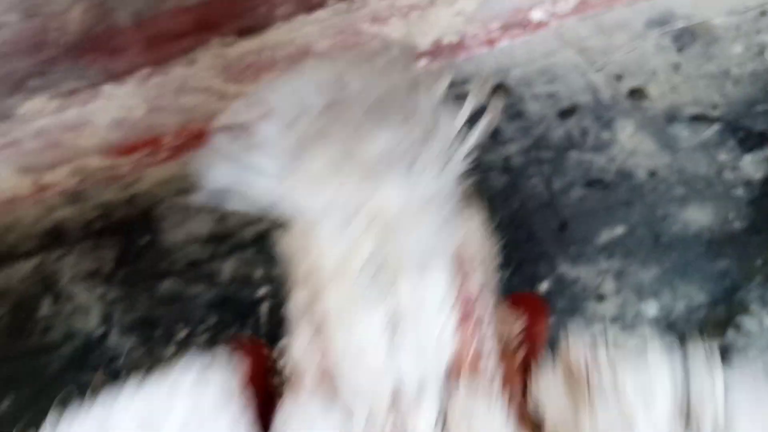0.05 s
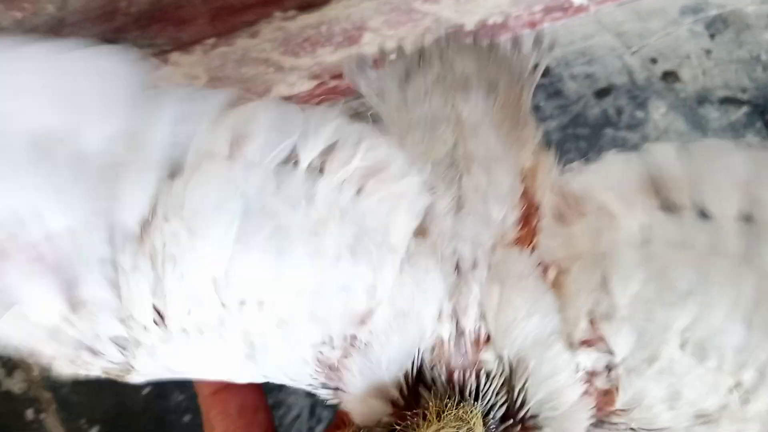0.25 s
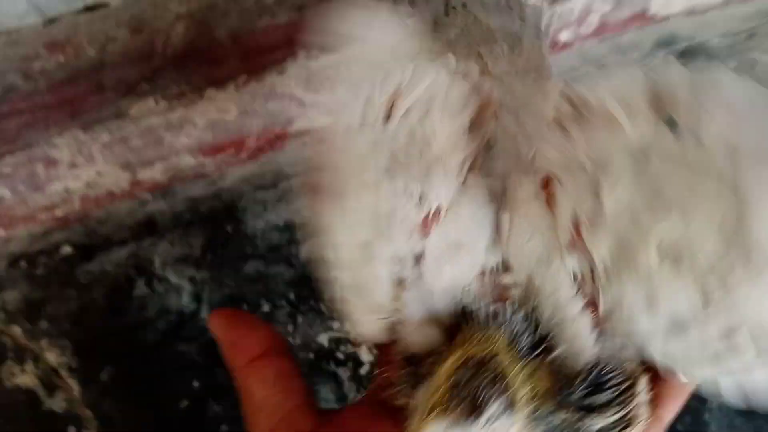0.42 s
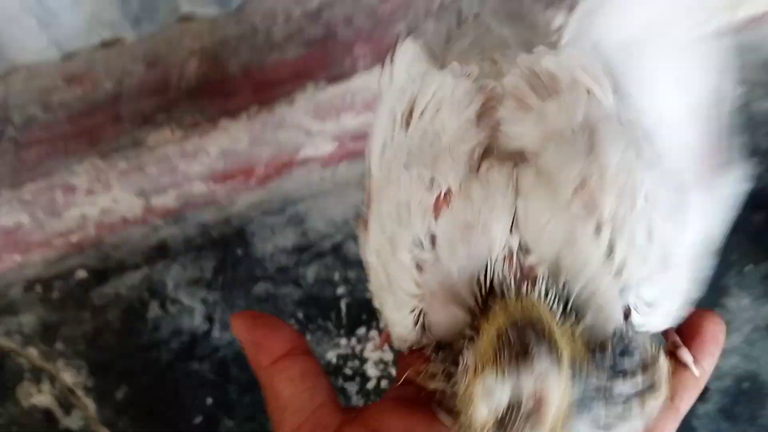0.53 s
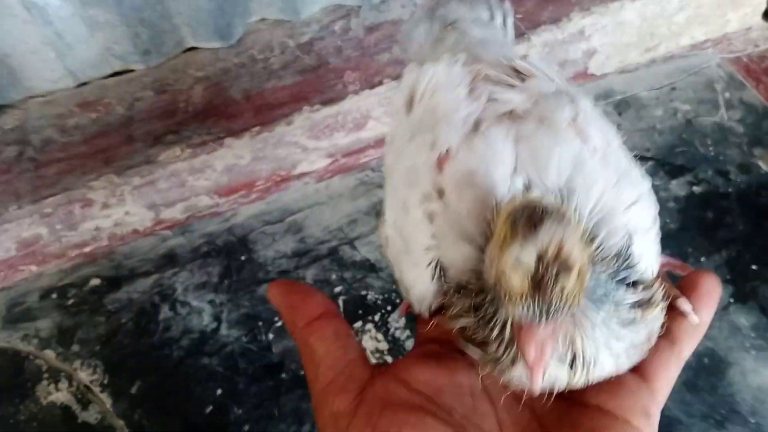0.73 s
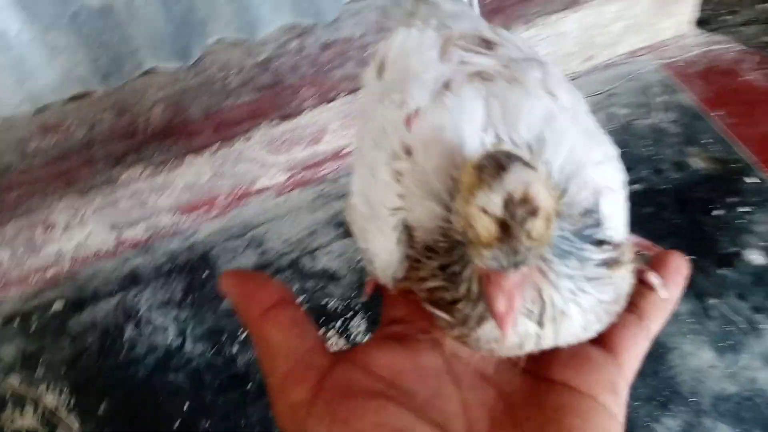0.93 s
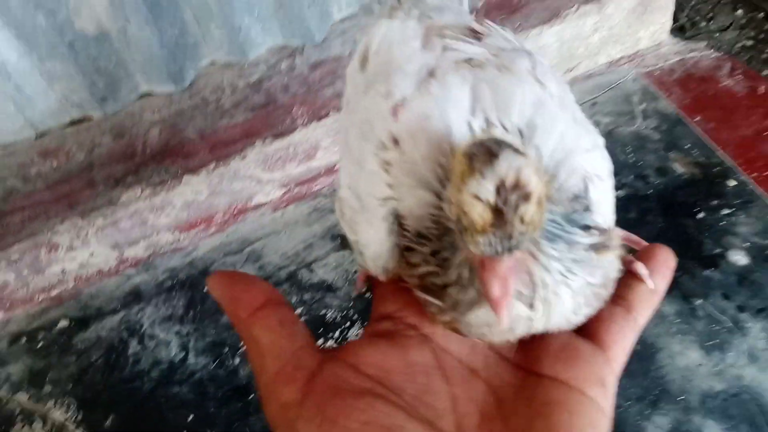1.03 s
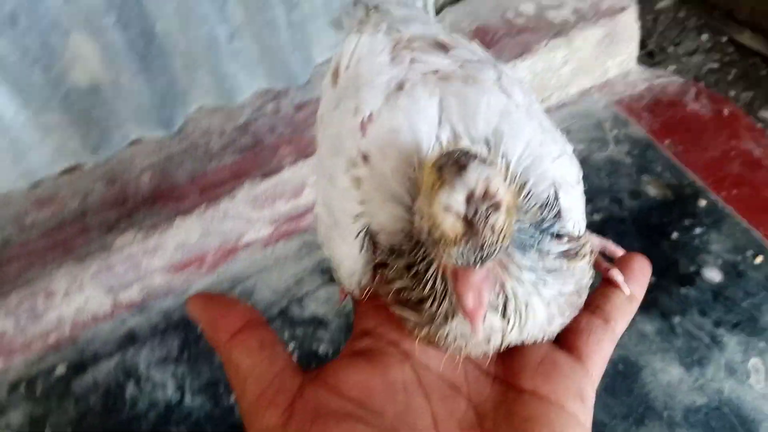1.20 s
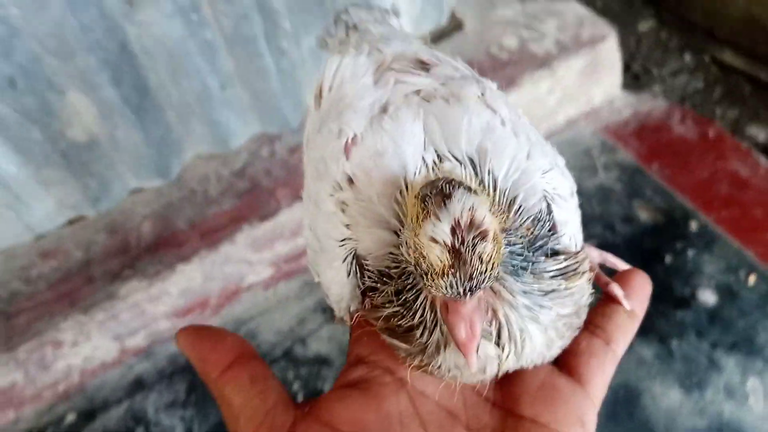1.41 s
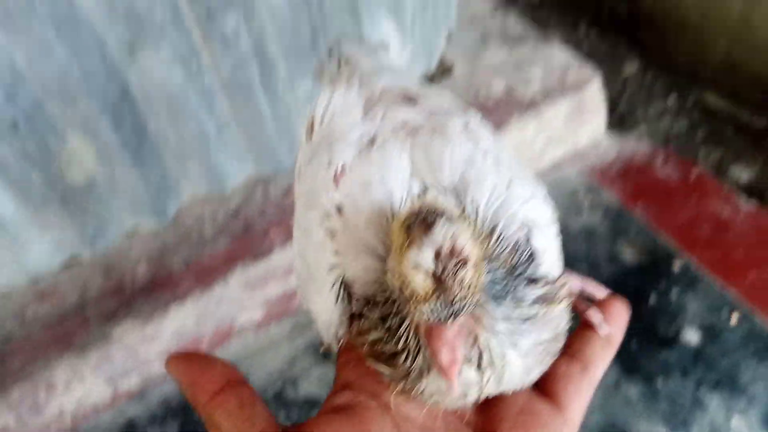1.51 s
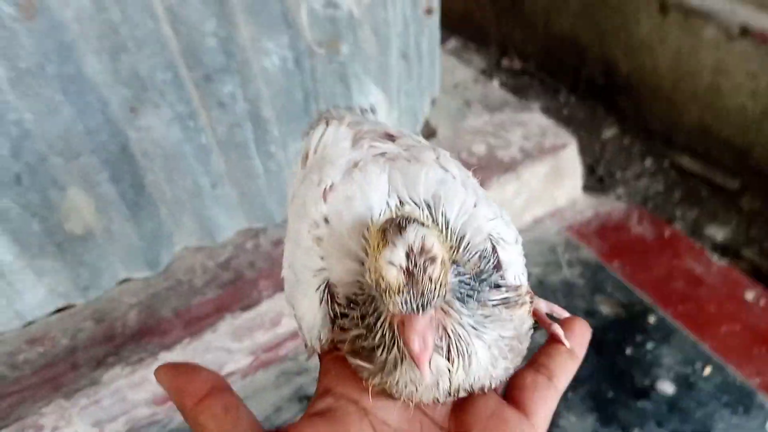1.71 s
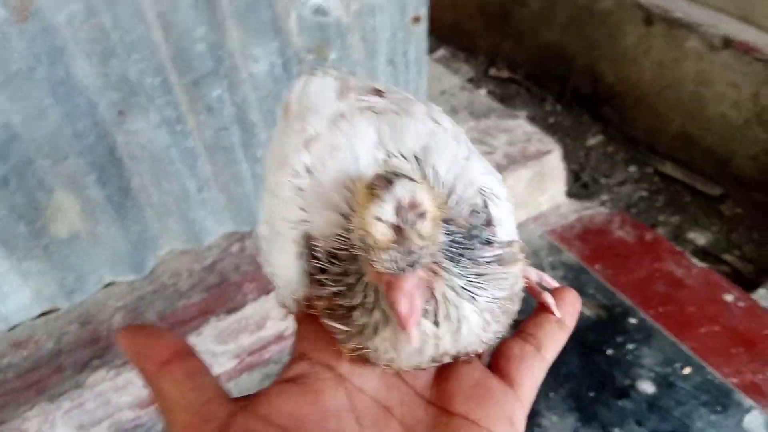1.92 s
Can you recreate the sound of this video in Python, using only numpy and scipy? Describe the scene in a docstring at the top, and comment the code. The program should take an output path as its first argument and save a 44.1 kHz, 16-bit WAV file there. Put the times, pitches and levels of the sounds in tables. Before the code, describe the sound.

Three shrill, fluttering peeps from a hand-held pigeon chick, with small knocks and faint outdoor hush

```python
"""In a small hard-walled yard a hand-held pigeon chick gives three thin peeps close to a phone.
Each peep is a whistle that climbs in pitch and falls at its end; a slower flutter in the throat
modulates it, adding side tones. Feathers and claws rustle as shaped bursts of band-limited noise,
and knocks are short pushes that ring the resonances of the phone's case.
A steady outdoor hush of coloured noise, with a low hum of narrow noise bands, lies under it all."""
import sys
import numpy as np
from scipy import signal
from scipy.fft import rfft, irfft, next_fast_len
from scipy.io import wavfile
from scipy.ndimage import uniform_filter1d, minimum_filter1d, map_coordinates

SR = 44100
rng = np.random.default_rng(int(sys.argv[2]) if len(sys.argv) > 2 else 0)


def wrap_up_sound(samples):
    """Save the sound to the file named by the first command line argument, as 16-bit audio."""
    columns = np.atleast_2d(samples).T
    # keep every value between -1 and 1, then stretch to whole-number steps
    tamed = np.clip(columns, -1, 1)
    steps = np.round(tamed * 32767).astype(np.int16)
    wavfile.write(sys.argv[1], SR, steps)


N = 85995

# Whistle contour, one list per peep: [t/s, f/Hz, level/dB before port colour, hoarseness/(0-1)]
PEEP_CONTOURS = [
    [(0.188, 4710, -49, 0.2), (0.198, 4637, -32.5, 0.12), (0.206, 4600, -35.5, 0.12),
     (0.218, 4954, -29.5, 0), (0.224, 5040, -48, 0.12), (0.226, 5267, -30.5, 0.2), (0.232, 5175, -28, 0.12),
     (0.238, 5270, -27, 0.12), (0.244, 5262, -17.5, 0.14), (0.292, 5567, -26.5, 0.22),
     (0.326, 5776, -23, 0.22), (0.386, 5980, -26.5, 0.22), (0.408, 5850, -31, 0.22),
     (0.418, 6184, -30.5, 0.2), (0.464, 6202, -29, 0.2), (0.476, 6230, -18, 0.07), (0.52, 6130, -21, 0.15),
     (0.528, 5894, -17, 0.01), (0.532, 5867, -32, 0.2), (0.538, 5625, -18, 0.2), (0.548, 4945, -29, 0.2),
     (0.556, 5087, -34.5, 0.2)],
    [(0.715, 4430, -54.5, 0.06), (0.721, 4513, -37.5, 0.09), (0.728, 4600, -40, 0.1),
     (0.736, 5145, -26.5, 0.06), (0.746, 5166, -48, 0.1), (0.76, 5252, -24.5, 0.1), (0.808, 5440, -22.5, 0),
     (0.814, 5261, -23, 0.06), (0.828, 5280, -29.5, 0.1), (0.844, 5192, -29.5, 0.1),
     (0.856, 5296, -24, 0.06), (0.862, 5330, -20.5, 0.1), (0.876, 5247, -25, 0.05),
     (0.92, 5577, -22.5, 0.1), (0.996, 5714, -18.5, 0.1), (1.012, 5400, -19.5, 0.05),
     (1.016, 4970, -34, 0.05), (1.02, 5014, -19, 0.1), (1.032, 4564, -28.5, 0.05), (1.04, 4944, -41, 0.05)],
    [(1.358, 4650, -65, 0.1), (1.366, 4680, -32.5, 0), (1.376, 4860, -39, 0), (1.4, 5136, -30.5, 0.04),
     (1.432, 5060, -32.5, 0.13), (1.462, 5260, -27, 0.13), (1.482, 5130, -25.5, 0), (1.5, 5347, -27, 0.13),
     (1.566, 5540, -29.5, 0.13), (1.604, 5424, -23.5, 0.06), (1.62, 5597, -25.5, 0.13),
     (1.642, 5590, -25, 0), (1.654, 5300, -27, 0.1), (1.67, 4680, -29, 0.09), (1.68, 4790, -85, 0.04)],
]
# Throat flutter: [t/s, rate f/Hz, first side tone level/dB, step to each further side tone level/dB,
# unevenness of rate f/Hz]
THROAT_FLUTTER = [(.19, 501.2, -35, -11, 40), (0.207, 567.4, -3, -15, 40), (0.223, 348.4, -5.5, -16, 45),
                  (0.257, 250, -37, -13, 40), (.266, 450, -8, -17, 110), (.28, 900, -11.5, -15, 130),
                  (.29, 1284, -12, -27, 30), (.304, 2487, -27.5, -28.5, 26), (.31, 2770, -55, -31, 30),
                  (.402, 503.3, -47.5, -7, 230), (0.413, 700, -13, -8.5, 300), (.45, 797, -16.5, -8.5, 300),
                  (.468, 807, -24, -13, 37), (.475, 1006, -22.5, -10.5, 40), (.492, 1905, -24, -19, 27),
                  (.5, 1974, -59.5, -18, 35), (.712, 450, -5.5, -11, 60), (0.729, 398, 3, -6.5, 60),
                  (.74, 245, -27, -15, 30), (.762, 248, -32, -14.5, 18), (.772, 295, -11.5, -18, 18),
                  (0.796, 544, -2.5, -20, 41), (.815, 503, -10.5, -12, 47), (.83, 331, -6, -8, 69),
                  (0.851, 329, -1, -17, 18), (.858, 599, -8, -15.5, 60), (.875, 799, -8.5, -15, 70),
                  (.888, 1806, -31.5, -19, 35), (.897, 650, -23, -16, 17), (0.926, 783, -38.5, -12, 15),
                  (0.944, 724, -9, -19, 9), (.968, 546, -12, -11, 9.9), (.998, 600, -12, -10.5, 15),
                  (1.015, 657, -27, -9.5, 35), (1.031, 700, -44, -9, 40), (1.385, 200, -27, -12, 38),
                  (1.398, 377, -5, -15, 33), (1.409, 483, -6, -12, 15), (1.424, 504, -8.5, -13.5, 35),
                  (1.432, 397, -34, -11, 20), (1.45, 323, -11.5, -10.5, 15), (1.474, 353.5, -19.5, -21, 15),
                  (1.56, 356, -34, -12, 20), (1.602, 450, -19, -10, 13), (1.62, 700, -19.5, -18, 15),
                  (1.651, 700, -28, -17, 22), (1.675, 996, -23.5, -15, 30)]
# Swing of each peep's overtones by the flutter, relative to that of the whistle: [ratio], one per peep
OVERTONE_SWING = [1.3, 0.98, .45]
# Contacts on the case: [t/s, push level/dB, decay time/ms]
CASE_CONTACTS = [(0.6041, -6.5, 0.41), (0.6071, -15.5, 0.66), (0.6133, -21.5, 1.6), (0.7184, -16, 0.38),
                 (0.7192, -10, 0.3), (1.6914, -1.5, 0.075), (1.6925, -4.5, 0.39), (1.6941, -7.5, 0.095),
                 (1.6955, -4, 0.22), (1.7009, -23, 1.5)]
# Resonances of the case: [f/Hz, width f/Hz, level/dB]
CASE_MODES = [(77.4, 90, -2.5), (277, 129, 2), (450, 200, -1.5), (837, 890, -6), (4000, 7800, -1.5)]
# Feather and claw rustles: [t/s, decay time/s, level/dB before grain and envelope, centre f/Hz,
# half-width/octaves]
FEATHER_RUSTLES = [(0.337, 0.0022, -37.5, 14400, 0.4), (.405, 0.052, -37, 5320, 0.3),
                   (0.405, 0.036, -46, 14300, 0.64), (0.604, 0.003, -37, 2500, 0.83),
                   (0.72, 0.0012, -45, 11000, 0.8), (.733, .002, -49, 15000, .15),
                   (1.143, 0.0033, -32.5, 3020, 0.37), (1.144, 0.0044, -32, 5800, 0.37),
                   (1.148, 0.015, -39.5, 4000, 0.58), (1.283, 0.0091, -38.5, 4170, 0.61),
                   (1.718, 0.0032, -48, 3800, 0.6)]
# Colour of close sounds at the microphone port: [f/Hz, level/dB]
PORT_COLOUR = [(4000, 1), (6200, 2), (7200, -3), (8800, -10), (10500, -6.5), (13000, -0.5), (14000, -3),
               (15200, 4)]
# Relative spectral density of the hush: [f/Hz, level/dB per Hz]
HUSH_SPECTRUM = [(28, -13.5), (45, 0), (70, 2.5), (185, -2.5), (420, -5), (520, -9), (911, -12),
                 (1400, -9.5), (2610, -13), (4870, -17), (6300, -14.5), (7300, -28.5), (8300, -41),
                 (9800, -51), (14000, -59.5), (16000, -44)]
# Course of the hush: [t/s, level/dB before HUSH_LIFT_DB, low mids boost/dB, treble boost/dB]
HUSH_COURSE = [(0.0, -46.5, 0.5, 5.5), (0.314, -45.5, 6, 11.5), (0.82, -47.5, -1, 4),
               (1.042, -46, -0.5, -1), (1.95, -49, 2.5, -7.5)]
# Wavering tones: [f/Hz, half-width f/Hz, level/dB]
HUM_BANDS = [(97, 41, -54.5), (200, 25.3, -46), (1276, 10, -60)]

# Random motion of the whistle: pitch, level, and hoarse blur (curve knots a second)
JITTER_HZ, SHIMMER_DB, HOARSE_KNOTS_PER_S = 26.5, 1, 700
LOWER_SIDE_DB = -20  # strength of the side tone one flutter rate below the whistle
RAGGED_PER_HZ, RAGGED_KNOTS_PER_S = .005, 159.8  # uneven flutter breaks up the side tones
OVERTONE_DB = [-28.5, -36, -28]  # second harmonic under the whistle, one per peep
THIRD_DB = -20.5  # third harmonic under the second
OVERTONE_SIDES_HZ = 900  # flutter well above this rate leaves the overtones nearly alone
# Air noise that follows the flutter's strength
RASP_DB, RASP_HZ, RASP_HALF_WIDTH_HZ = -38, 12500, 1300
YARD_DB, YARD_T60_S, YARD_GAP_S, YARD_DULL_HZ = -12, 0.17, 0.012, 10000
TIP_SHARE = .15  # rounding of a push's point, as a share of its decay
RUSTLE_EDGE_SHARE, GRAIN_DB = 0.27, 3.5  # soft edge as a share of the decay; depth of grain
LOW_MIDS_HZ, TREBLE_HZ, HUSH_LIFT_DB = 700, 6800, 6
LOW_CUT_HZ, TOP_HZ = 48.5, 15900
DUCK_OVER, DUCK_HOLD_S = 0.2, 0.017  # gain control: threshold amplitude, hold time


def amp(db):
    """A level in decibels is twenty times the logarithm of the amplitude ratio."""
    return 10 ** (np.asarray(db) / 20)


def unit(x):
    """Division by the root mean square makes the effective amplitude one."""
    return x / np.sqrt(np.mean(x ** 2) + 1e-20)


def wobble(rate):
    """Interpolation of independent normal values, rate knots a second, gives a smooth random curve."""
    knots = rng.standard_normal(int(N * rate / SR) + 4)
    return map_coordinates(knots, [np.arange(N) * rate / SR])


def complex_wobble(rate):
    """Two independent random curves in quadrature vary both amplitude and phase."""
    return wobble(rate) + 1j * wobble(rate)


def filtered(x, response):
    """Linear filtering is multiplication of the spectrum by a response of frequency."""
    m = next_fast_len(N + SR // 2)
    return irfft(rfft(x, m) * response(np.fft.rfftfreq(m, 1 / SR)), m)[:N]


def gate(t, start, end, fade):
    """A squared-sine window opens and closes a sound without a step."""
    return np.sin(np.pi / 2 * np.clip(np.minimum(t - start, end - t) / fade, 0, 1)) ** 2


def chick():
    """Modulation of a carrier: throat flutter puts side tones about a whistle with weak harmonics."""
    t = np.arange(N) / SR
    when, hz, level_db, hoarse = np.transpose(np.vstack(PEEP_CONTOURS))
    gates = [gate(t, p[0][0] - .003, p[-1][0] + 0.0041, 0.0075) for p in PEEP_CONTOURS]
    pitch = np.interp(t, when, hz) + JITTER_HZ * wobble(300)
    whistle = np.exp(2j * np.pi * np.cumsum(pitch) / SR)

    flutter_when, *columns = np.transpose(THROAT_FLUTTER)
    rate, first_db, next_db, uneven = [np.interp(t, flutter_when, c) for c in columns]
    turn = np.exp(2j * np.pi * np.cumsum(rate + uneven * wobble(400)) / SR)
    # A geometric series of side tones above the whistle, and one below
    strength = amp(first_db + 0.97 * wobble(120))
    upper_sides = turn / (1 - np.minimum(amp(next_db), .8) * turn)
    sides = strength * (upper_sides + amp(LOWER_SIDE_DB) / turn)
    sides = sides * (1 + np.minimum(RAGGED_PER_HZ * uneven, .7) * complex_wobble(RAGGED_KNOTS_PER_S))
    tone = (1 + sides) * whistle

    blur = np.interp(t, when, np.clip(hoarse, 0, 1)) * complex_wobble(HOARSE_KNOTS_PER_S)
    # Powers of the modulated whistle form its harmonics
    swing = sum(g * k for g, k in zip(gates, OVERTONE_SWING))
    slow_sides = sides / (1 + (rate / OVERTONE_SIDES_HZ) ** 4)
    base = (1 + 0.51 * blur + slow_sides * swing) * whistle
    overtone_gain = sum(g * amp(d) for g, d in zip(gates, OVERTONE_DB))
    overtones = overtone_gain * (base ** 2 + amp(THIRD_DB) * base ** 3)

    noise = rng.standard_normal(N)
    air = unit(filtered(noise, lambda f: 1 / (1 + ((f - RASP_HZ) / RASP_HALF_WIDTH_HZ) ** 2)))
    rasp = amp(RASP_DB + first_db + 3 * wobble(90)) * air
    loudness = amp(np.interp(t, when, level_db) + SHIMMER_DB * wobble(150))
    voice = (1 + blur) * (sum(gates) * (tone + rasp) + overtones) * loudness
    return np.sqrt(2) * voice.real


def yard(x):
    """Reverberation: close walls return a dense tail that decays exponentially and lacks high treble."""
    t = np.arange(SR // 3) / SR
    tail = rng.standard_normal(len(t)) * amp(-60 * t / YARD_T60_S) * (t > YARD_GAP_S)
    echo = signal.fftconvolve(x, tail / np.linalg.norm(tail))[:N]
    return amp(YARD_DB) * filtered(echo, lambda f: 1 / (1 + (f / YARD_DULL_HZ) ** 4))


def knocks():
    """Forced resonance: short pointed pushes set the damped modes of the case ringing."""
    t = np.arange(N) / SR
    push = sum(amp(db) * np.exp(-np.hypot((t - s) * 1000 / ms, TIP_SHARE)) for s, db, ms in CASE_CONTACTS)

    def modes(f):
        """Each mode is a band-pass resonance; the first moves in opposite phase."""
        total = 0
        for k, (centre, width, db) in enumerate(CASE_MODES):
            sign = -1 if k == 0 else 1
            damping = 1j * f * width
            total = total + sign * amp(db) * damping / (centre * centre - f * f + damping)
        return total

    return filtered(push, modes)


def rustles():
    """Friction noise: grainy band-limited puffs rise quickly and decay exponentially."""
    t, out = np.arange(N) / SR, np.zeros(N)
    for s, decay, db, hz, octaves in FEATHER_RUSTLES:
        noise = rng.standard_normal(N)
        puff = unit(filtered(noise, lambda f: np.exp(-.5 * (np.log2((f + 1) / hz) / octaves) ** 4)))
        window = gate(t, s, s + 2 * decay, RUSTLE_EDGE_SHARE * decay)
        shape = window * np.exp(-np.clip(t - s, 0, 1) / decay)
        out += puff * shape * amp(db + GRAIN_DB * wobble(440))
    return out


def hush():
    """Coloured noise: broad outdoor noise is weighted by a spectrum and patchy in time and frequency."""
    t = np.arange(N) / SR
    z = signal.stft(rng.standard_normal(N), nperseg=512)[2]
    patches = uniform_filter1d(uniform_filter1d(rng.standard_normal(z.shape), 5, 0), 10, 1)
    noise = signal.istft(z * amp(2.0 * unit(patches)), nperseg=512)[1][:N]
    f, db = np.transpose(HUSH_SPECTRUM)
    air = unit(filtered(noise, lambda hz: amp(np.interp(np.log(hz + 1), np.log(f), db, left=-60))))

    s, level_db, mids_db, treble_db = np.transpose(HUSH_COURSE)
    mids = filtered(air, lambda hz: np.exp(-2 * np.log2((hz + 1) / LOW_MIDS_HZ) ** 2))
    treble = filtered(air, lambda hz: 1 / (1 + (TREBLE_HZ / (hz + 1)) ** 16))
    for part, boost_db in [(mids, mids_db), (treble, treble_db)]:
        air = air + part * (amp(np.interp(t, s, boost_db)) - 1)
    return air * amp(np.interp(t, s, level_db) + HUSH_LIFT_DB)


def hum():
    """Narrow-band noise: the narrower the band about its centre, the slower a tone wavers."""
    out = np.zeros(N)
    for centre, width, db in HUM_BANDS:
        noise = rng.standard_normal(N)
        out += amp(db) * unit(filtered(noise, lambda hz: 1 / (1 + ((hz - centre) / width) ** 2)))
    return out


def scene():
    """Superposition: close sounds and yard echo share the port's colour; the background is added."""
    bird = chick()
    close = bird + yard(bird) + knocks() + rustles()
    coloured = filtered(close, lambda f: amp(np.interp(f, *np.transpose(PORT_COLOUR))))
    return (coloured + hush() + hum())[None]


def record(dry):
    """Band limiting and gain control: a low cut, a held gain dip after loud peaks, a sharp top limit."""
    x = signal.sosfilt(signal.butter(4, LOW_CUT_HZ, 'high', fs=SR, output='sos'), dry[0])
    # The square root halves the excess in decibels
    need = np.minimum(1, np.sqrt(DUCK_OVER / (np.abs(x) + 1e-9)))
    hold = round(DUCK_HOLD_S * SR)
    # Padding delays the dip, so that it follows its peak
    delayed = np.pad(need, (hold // 2 + 150, 0), constant_values=1)
    held = minimum_filter1d(delayed, size=hold)[:N]
    gain = uniform_filter1d(held, size=200)
    return filtered(x * gain, lambda hz: hz < TOP_HZ)[None]


dry = scene()
out = record(dry)
wrap_up_sound(out)
```